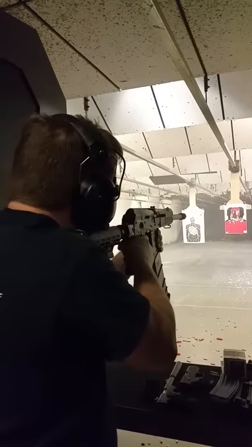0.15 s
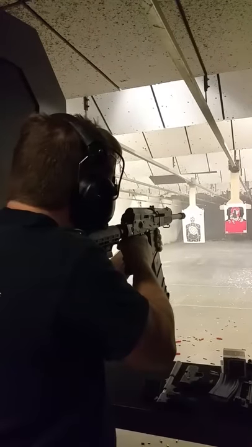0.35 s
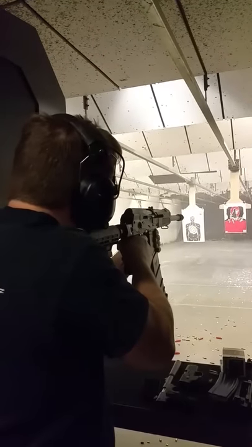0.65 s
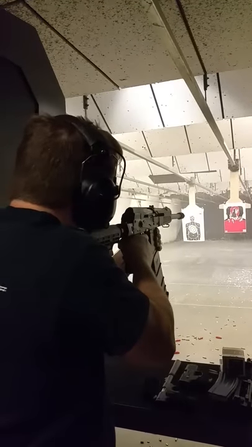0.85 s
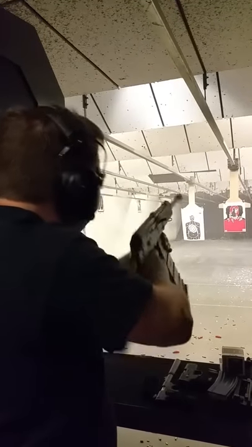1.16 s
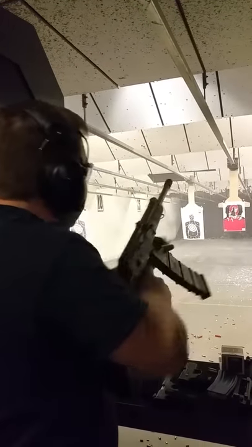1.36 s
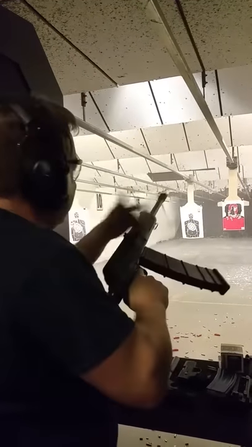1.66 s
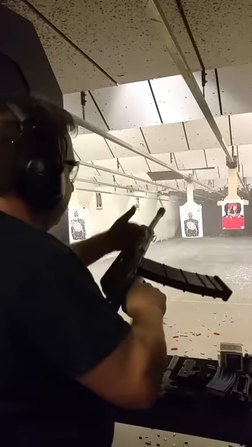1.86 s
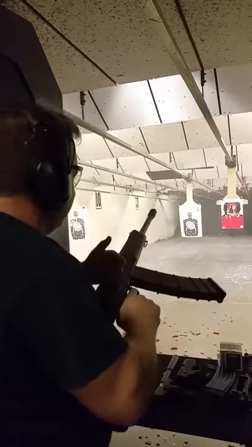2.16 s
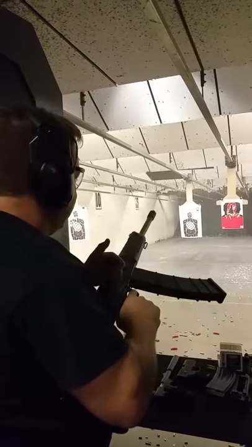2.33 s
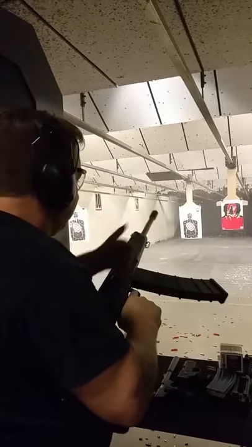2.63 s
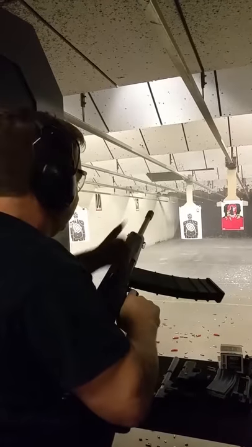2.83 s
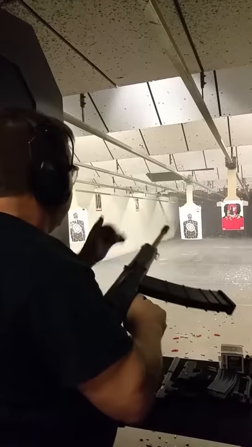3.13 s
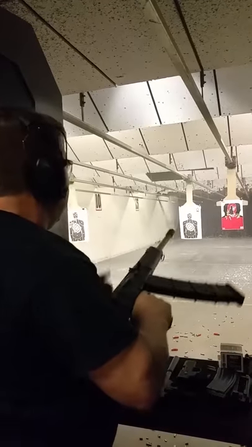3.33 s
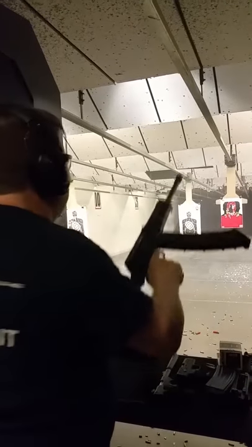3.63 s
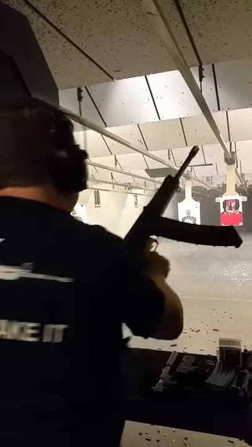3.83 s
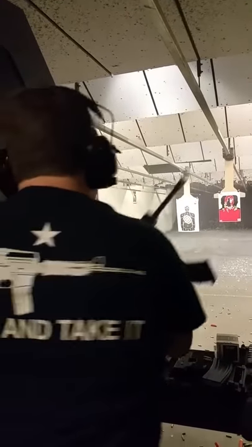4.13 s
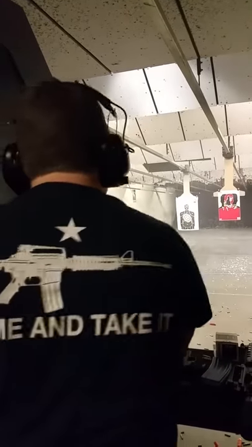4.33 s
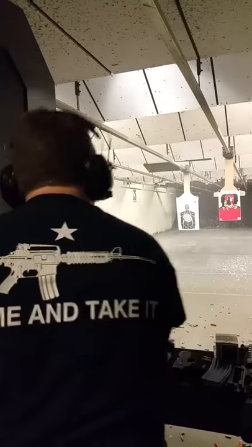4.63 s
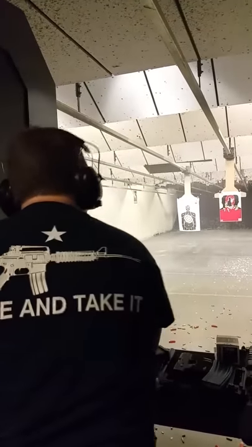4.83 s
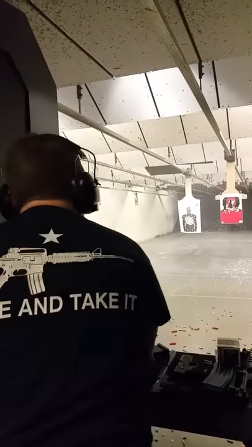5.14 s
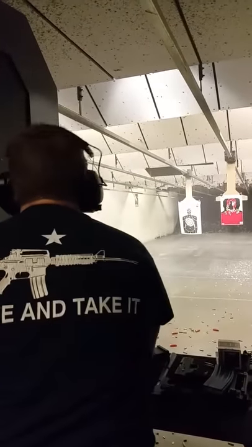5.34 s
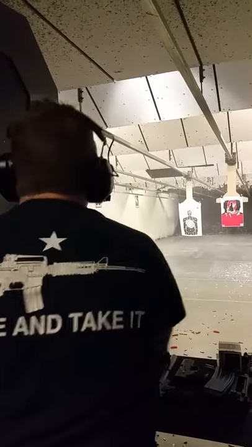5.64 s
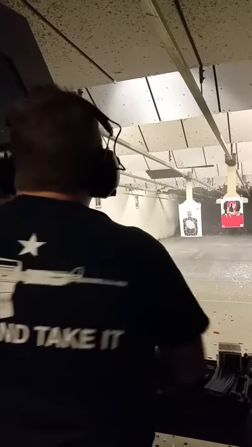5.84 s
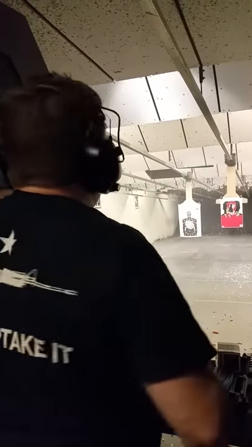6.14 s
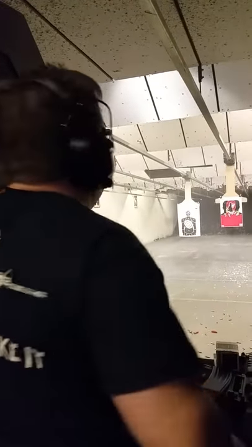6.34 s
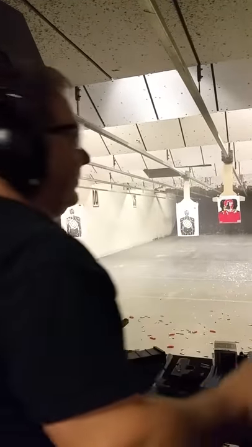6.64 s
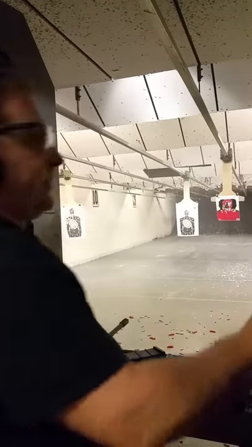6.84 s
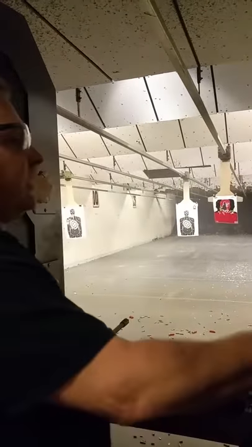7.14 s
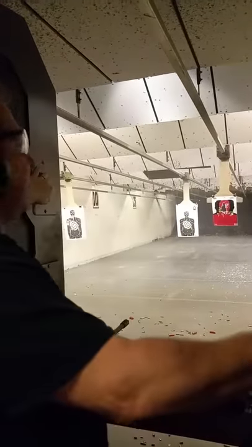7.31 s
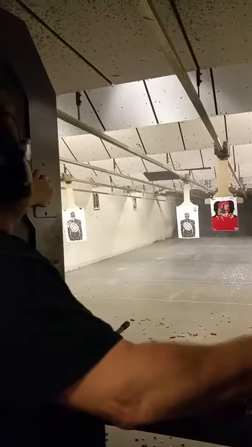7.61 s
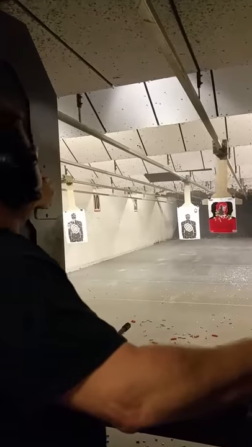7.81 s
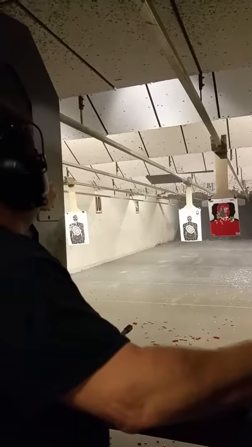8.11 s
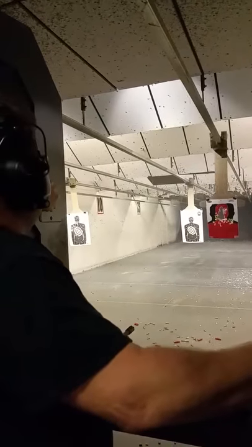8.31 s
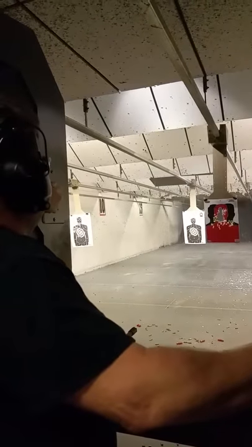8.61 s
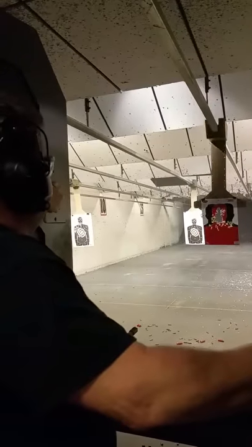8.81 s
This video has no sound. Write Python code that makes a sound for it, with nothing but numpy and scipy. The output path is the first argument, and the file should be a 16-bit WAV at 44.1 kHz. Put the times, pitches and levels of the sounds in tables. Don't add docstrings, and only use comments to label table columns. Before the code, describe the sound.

Ventilation rushes steadily in a resonant booth of a concrete indoor range. A close shot cracks at 0.2 seconds, bright hiss first, then a low boom from the far wall. A hard steel clack follows at 0.5 and a duller distant shot at 0.7. The second close blast lands at 1.6. From 2.0 to 2.9 a rifle bolt slides, ticks and slams, with a distant shot at 2.8. Another close blast hits at 3.1, a low far shot at 3.5 and a tiny brass tinkle at 3.8. A heavy bench scrape swells from 4.55 to 5.1. A loud duller shot at 5.1 precedes the fourth close blast at 5.3; strong and weak distant shots follow at 6.0 and 6.5. A thin, chattering wheel squeaks at 6.7 to 7.4, with a light rub near its end. The last close blast booms at 7.5, then a weak shot at 8.8 and bass thud at 8.9. Limiting dips the background before blasts.

```python
import sys
import numpy as np
from scipy import signal
from scipy.io import wavfile
from scipy.ndimage import uniform_filter1d, minimum_filter1d

SR = 44100
rng = np.random.default_rng(int(sys.argv[2]) if len(sys.argv) > 2 else 0)


def field_ratio(decibels):
    return 10 ** (np.asarray(decibels, dtype=float) / 20)


def pcm_store(signal):
    levels = np.round(np.clip(np.atleast_2d(signal), -1, 1) * 32767)
    wavfile.write(sys.argv[1], SR, levels.astype(np.int16).T)


N = 395577


def evened(x):
    return x / np.sqrt(np.mean(x ** 2) + 1e-20)


def read(points, hz):
    f, value = np.transpose(points)
    return np.interp(np.log(hz + 1), np.log(f + 1), value)


def shape(points, hz):
    gain = field_ratio(read(points, hz))
    return gain / np.sqrt(np.mean(gain ** 2))


def add(mix, s, sound):
    part = mix[:, round(s * SR):][:, :sound.shape[1]]
    part += sound[:, :part.shape[1]]


def panned(x, pan_db):
    return x * field_ratio(np.array([[pan_db / 2], [-pan_db / 2]]))


def diffuse(seconds, gain, size=512, patchy_db=0., like=None):
    # f/Hz, correlation
    hall_like = [(60, .78), (150, .77), (300, .75), (600, .63), (1200, .15), (2400, 0), (15000, 0)]
    # f/Hz, level/dB
    tilt = [(60, 3.5), (150, 0.5), (400, 1.5), (1000, -1), (2400, 1), (5000, -3), (9000, -6), (15000, -2)]
    hz = np.fft.rfftfreq(size, 1 / SR)[:, None]
    t = np.arange(int(seconds * SR) * 4 // size + 2) * size / 4 / SR
    a, b, c, d, patches = rng.standard_normal((len(t), len(hz), 5)).T
    patches = uniform_filter1d(patches, size=24, axis=0)
    patches = evened(uniform_filter1d(patches, size=3, axis=1))
    same = np.clip(read(hall_like if like is None else like, hz), -1, 1)
    left = a + 1j * b
    right = same * left + np.sqrt(1 - same ** 2) * (c + 1j * d)
    tilt_db = read(tilt, hz)
    port_db = np.array([tilt_db, -tilt_db]) / 2
    z = np.array([left, right]) * gain(t, hz) * field_ratio(port_db + patchy_db * patches)
    return signal.istft(z, nperseg=size, noverlap=size * 3 // 4)[1] / np.sqrt(size / 5)


def air():
    # f/Hz, level/dB
    rush = [(15, -53), (25, -16.5), (131, -14.5), (187, -21.5), (220, -12.5), (252, -10.5), (389, -8),
            (538, -14.5), (902, -10), (1730, -22.5), (4860, -36.5), (5570, -39.5), (6040, -41),
            (15200, -52), (16500, -75)]
    # f/Hz, correlation
    duct_like = [(60, .95), (150, .9), (300, .8), (640, .45), (1400, -.05), (3000, -.1), (7000, 0)]

    def field(t, hz):
        return field_ratio(-37.5 + 0 * t) * shape(rush, hz)
    return diffuse(N / SR, field, size=2048, patchy_db=1., like=duct_like)[:, :N]


def squeak():
    turns_db = [-58, -56, -56]
    chatter_per_s = [40, 30, 28.4]
    chatter_depth = [.55, .7, .95]
    turn_s, fade_db_per_s = .213, 55
    pitch_hz, rise_hz_per_s, waver_hz = 5380, 120, 22.
    t = np.arange(0, len(turns_db) * turn_s, 1 / SR)
    turn = np.minimum(t // turn_s, len(turns_db) - 1).astype(int)
    since = t % turn_s
    waver = waver_hz * evened(uniform_filter1d(rng.standard_normal(len(t)), size=400))
    tone = np.sqrt(2) * np.sin(2 * np.pi * np.cumsum(pitch_hz + rise_hz_per_s * t + waver) / SR)
    catch = np.cos(np.pi * np.take(chatter_per_s, turn) * since + .8) ** 4
    chatter = 1 - np.take(chatter_depth, turn) * catch
    bite = np.minimum(since / .006, 1)
    level = field_ratio(np.take(turns_db, turn) - fade_db_per_s * since) * bite
    return panned(level * chatter * tone, 0.)


def chirp(hz, db, length_s):
    t = np.arange(0, length_s, 1 / SR)
    return panned(field_ratio(db) * np.sin(2 * np.pi * hz * t) * np.hanning(len(t)), 0.)


def scrape(from_db, swell_s, top_db, hold_s):
    # f/Hz, level/dB
    rumble = [(15, -48), (25, -3), (220, -13.5), (313, -0.5), (524, -9.5), (809, -2.5), (1390, -15),
              (2530, -21), (8830, -40.5), (15200, -45), (16500, -68)]

    def field(t, hz):
        press_db = from_db + (top_db - from_db) * np.minimum(t / swell_s, 1)
        bright_db = 0.05 * (press_db + 23) * np.log2(1 + hz / 1500)
        return field_ratio(press_db + bright_db) * shape(rumble, hz)
    x = diffuse(swell_s + hold_s, field, size=1024, patchy_db=0.2)
    return x * signal.windows.tukey(x.shape[1], .05)


def steel(hz, ring_hz, bright_db):
    # f/Hz, level/dB
    rattle = [(470, -33), (800, -1), (1140, 7.5), (1490, -12), (1940, 2), (2870, 0), (4310, 1.5),
              (7430, -1), (14900, -3.5), (16500, -9.5)]
    part_ring = 1.3 / (1 + ((hz - ring_hz) / 220) ** 2)
    receiver_ring = .7 / (1 + ((hz - 7350) / 250) ** 2)
    return shape(rattle, hz) * (1 + (part_ring + receiver_ring)) * field_ratio(bright_db * np.log2(hz / 4000 + .3))


def slide(length_s, db, ring_hz, pan_db):
    spots_per_s, spread_db, spot_s, steady = 500, 5.5, 0.0016, 0.58

    def field(t, hz):
        return field_ratio(db - 60 * np.maximum(t - length_s, 0) / .12) * steel(hz, ring_hz, -.8)
    x = diffuse(.25, field, size=256, patchy_db=2.5)
    t = np.arange(x.shape[1]) / SR
    chance, size = rng.random((len(t), 2)).T
    spots = (chance < spots_per_s / SR) * field_ratio(-spread_db * np.log(size + 1e-3))
    grit = evened(signal.lfilter([1], [1, -np.exp(-1 / (spot_s * SR))], spots))
    rub = steady + (1 - steady) * grit
    return panned(x * rub * np.minimum(t / 0.0069, 1), pan_db)


def bolt(db, ring_hz, pan_db, t60, bright_db):
    # f/Hz, level/dB, t60/s
    receiver = [(2080, 0, .05), (2970, 0, .045), (4670, -8, .03), (7270, 2, .06)]

    def field(t, hz):
        rattle = field_ratio(-60 * t / t60)
        booth = field_ratio(-19.0 - 60 * t / 0.34)
        return field_ratio(db - 5) * steel(hz, ring_hz, bright_db) * np.hypot(rattle, booth)
    x = diffuse(.25, field, size=256, patchy_db=1.5)
    t = np.arange(x.shape[1]) / SR
    modes = list(receiver) + [(ring_hz, 2.5, .06)]
    rings = 0
    for hz, top_db, ring_s in modes:
        size, phase = rng.random((2, 2, 1))
        mode_db = db - 11 + top_db - 6.5 * size + bright_db * np.log2(hz / 4000 + .3)
        rings = rings + field_ratio(mode_db - 60 * t / ring_s) * np.sin(2 * np.pi * (hz * t + phase))
    tick = 1 + 0.53 * np.exp(-t / 0.0032)
    return panned((x * tick + rings) * np.minimum(t / .0012, 1), pan_db)


def struck(x, rise_s, db, hz):
    t = np.arange(x.shape[1]) / SR
    u = np.minimum(abs(np.pi * hz * (t - .75 * rise_s)), 20)
    swing = field_ratio(db) * (1 - 2 * u ** 2) * np.exp(-u ** 2)
    return x * np.minimum(t / rise_s, 1) ** 2 - swing


def hall_t60(hz):
    # f/Hz, t60/s
    decay = [(60, 1.55), (250, 1.34), (800, 1.343), (2500, 1.38), (6000, 1.114), (9000, 0.77),
             (12000, 0.66), (15500, 0.47)]
    return read(decay, hz)


def far_shot(db, bright_db, bass_db, knock_hz):
    # f/Hz, level/dB
    dull = [(18, -54), (30, -9), (217, -12), (350, -0.5), (409, -2), (493, -3), (1270, -7), (2000, -22),
            (2890, -21.5), (3860, -28.5), (14100, -44.5), (15200, -46), (16500, -68)]
    echo_s = .024

    def field(t, hz):
        first = field_ratio(-60 * t / 0.53 * (1.5 + hz / 12000))
        knock = field_ratio(3.0 - 60 * t / 0.12) / (1 + ((hz - knock_hz) / 250) ** 2)
        tail = field_ratio(-17.5 - 60 * t / hall_t60(hz))
        colour_db = bright_db * np.log2(1 + hz / 2000) + bass_db / (1 + (hz / 345) ** 6)
        echo_db = 2 * np.exp(-((t - echo_s) / .007) ** 2)
        lull_db = -3. * np.exp(-((t - .62 * echo_s) / 0.0042) ** 2)
        level = field_ratio(db - 2.5 + colour_db + echo_db + lull_db)
        return level * shape(dull, hz) * np.sqrt(first ** 2 + knock ** 2 + tail ** 2)
    x = diffuse(0.87, field, patchy_db=0.5)
    return panned(struck(x, 0.00552, db + 5, 1200), -0.54)


def near_shot(blast_db, boom_db):
    # f/Hz, level/dB
    hiss_colour = [(35, -48), (60, -13.5), (759, 4), (1240, 3.5), (2520, 0.5), (4320, -0.5), (5600, -3),
                   (7780, -7.5), (9390, -4), (15000, -2.5), (16500, -54)]
    # f/Hz, t60/s
    hiss_t60 = [(300, .3), (1200, 0.27), (2500, 0.43), (6000, 0.27), (10000, 0.3), (15000, 0.31)]
    # f/Hz, level/dB
    boom_colour = [(18, -69), (30, -36), (93, -20.5), (201, -3.5), (268, -9), (388, 0.5), (506, -7.5),
                   (694, 1), (1420, -9.5), (1700, -18), (2220, -17.5), (7280, -24.5), (15200, -31),
                   (16500, -70.5)]
    # f/Hz, level/dB
    early_bass = [(60, -34), (300, -17), (1000, -24), (2500, -14), (6000, -14)]
    wall_s, wall_soft_s, full_s = 0.049, 0.004, 0.11

    def field(t, hz):
        hiss = field_ratio(blast_db - 60 * np.maximum(t - .04, 0) / read(hiss_t60, hz)) * shape(hiss_colour, hz)
        answer_s = wall_s * (1 + 60 / (hz + 100))
        waiting = 1 / (1 + np.exp((t - answer_s) / wall_soft_s))
        late = np.logaddexp(0, (t - full_s) / 0.043) * 0.052
        filling_db = -5. * np.exp(-(t / 0.055) ** 2) / (1 + (hz / 1200) ** 2)
        boom_left_db = waiting * read(early_bass, hz) + filling_db - 60 * late / hall_t60(hz)
        boom = field_ratio(boom_db + boom_left_db) * shape(boom_colour, hz)
        slap = field_ratio(2.5 * np.exp(-((t - 0.067) / .005) ** 2))
        return slap * np.hypot(hiss, boom)
    x = diffuse(2.2, field, patchy_db=0.5)
    return panned(struck(x, .0026, blast_db + 11, 900), .5)


def coloured(x):
    # f/Hz, level/dB
    response = [(20, -24), (45, -4.5), (90, -3), (7700, -0.5), (8100, -5.5), (12000, -4.5), (15700, -2.5)]
    # f/Hz, width/Hz, level/dB
    booth = [(97, 11.5, 5), (209.3, 6, 5.5), (291.7, 7, 3), (389, 60, 0), (544, 11, 2.5), (716, 15, 2),
             (862, 14, 2.5), (2350, 880, 2.5), (6750, 1200, 1.5)]
    hz = abs(np.fft.fftfreq(8192, 1 / SR))
    db = read(response, hz)
    for f, width, top_db in booth:
        db = db + top_db / (1 + (2 * (hz - f) / width) ** 2)
    log_gain = db * np.log(10) / 20
    phase = -signal.hilbert(log_gain).imag
    taps = np.fft.ifft(np.exp(log_gain + 1j * phase)).real[:4096]
    return signal.oaconvolve(x, taps[None], axes=1)[:, :N]


def scene():
    # t/s, f/Hz, level/dB, length/s
    tinkles = [
        (.98, 14500, -65.5, 0.015),
        (1.29, 14700, -61, .02),
        (3.83, 8450, -50, .03),
    ]
    # t/s, start level/dB, swell/s, top level/dB, hold/s
    scrapes = [
        (4.55, -42.5, 0.418, -24, .175),
        (7.27, -53, .145, -35.5, .055),
    ]
    # t/s, length/s, level/dB, ring f/Hz, pan/dB
    slides = [
        (2.005, 0.058, -32, 7200, 0),
        (2.478, 0.034, -35, 3700, 1),
        (2.526, 0.038, -25.5, 2250, 3),
        (2.655, .045, -41, 2250, 1),
        (2.70, 0.084, -33.5, 2600, 2),
        (2.908, .03, -22, 2100, 3),
    ]
    # t/s, level/dB, ring f/Hz, pan/dB
    clacks = [
        (0.5301, -9.5, 7100, -1),
        (2.077, -12, 7240, 2),
        (2.5232, -18, 2180, 3),
        (2.5672, -10, 2870, -1),
        (2.783, -19.5, 3060, 0),
        (2.9046, -21, 2210, -8),
        (2.936, -8.5, 2920, -2.5),
    ]
    # t/s, level/dB, ring f/Hz, pan/dB
    ticks = [
        (2.4714, -31.5, 4690, 1),
        (2.4806, -29, 3700, 1),
        (2.539, -24, 2090, 4),
        (2.6514, -31.5, 1970, 6),
        (2.7086, -27, 2580, 0),
        (2.9144, -14, 2100, 6),
        (4.8294, -43, 2480, -7),
        (5.039, -41, 2160, -.5),
        (7.2194, -50, 2080, -.5),
    ]
    # t/s, level/dB, ring f/Hz, pan/dB
    knocks = [
        (1.029, -40, 2690, 0),
        (2.4466, -34, 2170, .5),
        (5.118, -28, 1180, 4),
    ]
    # t/s, level/dB, brightness/dB, bass/dB, knock f/Hz
    far_shots = [
        (0.671, -7.5, 3.5, -10.5, 1110),
        (2.842, -8, 4.5, -11.5, 1060),
        (3.531, -9, 3.5, -9, 710),
        (5.14, 0, 3.5, -11, 1230),
        (6.025, 1.5, 5.8, -2, 834),
        (6.479, -11.5, 3.5, -11.5, 1180),
        (8.769, -11, 3, -10.5, 1090),
        (8.922, -31, -1, 18, 544),
    ]
    # t/s, blast level/dB, boom level/dB
    near_shots = [
        (0.184, -5, -4),
        (1.618, -6, -3.5),
        (3.106, -5, -3.5),
        (5.293, -4.5, -4),
        (7.496, -5.5, -3),
    ]
    mix = air()
    add(mix, 6.732, squeak())
    for table, source in ((tinkles, chirp), (scrapes, scrape), (slides, slide)):
        for s, *row in table:
            add(mix, s, source(*row))
    # t60 [s], brightness [dB per octave]
    for table, t60, bright_db in ((clacks, 0.079, -1.), (ticks, .115, -2), (knocks, 0.077, -10.)):
        for s, *row in table:
            add(mix, s, bolt(*row, t60, bright_db))
    for s, *row in far_shots:
        add(mix, s - .003, far_shot(*row))
    for s, *row in near_shots:
        add(mix, s, near_shot(*row))
    return coloured(mix)


def band_limit(x):
    return signal.sosfilt(signal.butter(12, 16790, fs=SR, output="sos"), x)


def record(dry):
    power = uniform_filter1d((dry ** 2).mean(0), size=300)
    power_db = 10 * np.log10(abs(power) + 1e-12)
    ahead_db = -minimum_filter1d(-power_db, size=901)
    fall = np.arange(N) * 270.0 / SR
    peak_db = np.maximum.accumulate(ahead_db + fall) - fall
    over_db = np.maximum(peak_db + 18.0, 0)
    held = dry / field_ratio(0.33 * uniform_filter1d(over_db, size=300))
    clipped = 1.208 * np.tanh(held / 1.312)
    edge = signal.firwin(1023, 15800, window=("kaiser", 8), fs=SR)
    return band_limit(signal.oaconvolve(clipped, edge[None], "same", axes=1))


dry = scene()
out = record(dry)
pcm_store(out)
```